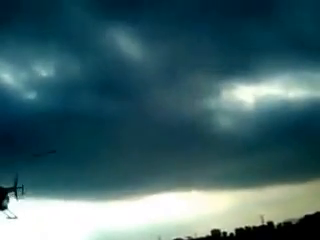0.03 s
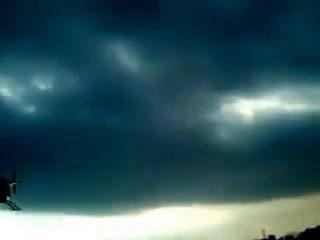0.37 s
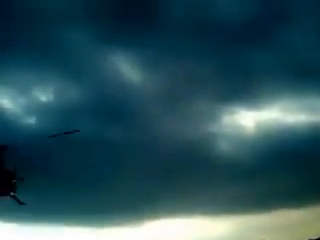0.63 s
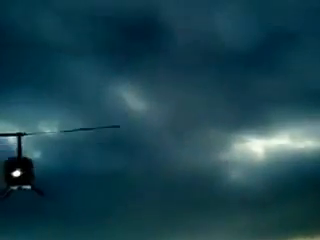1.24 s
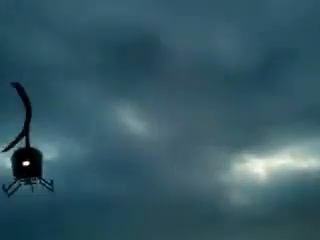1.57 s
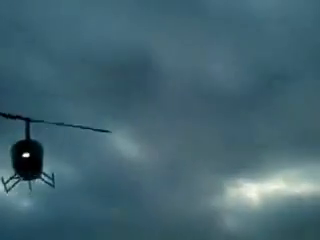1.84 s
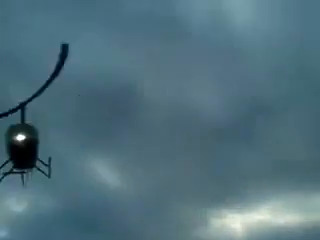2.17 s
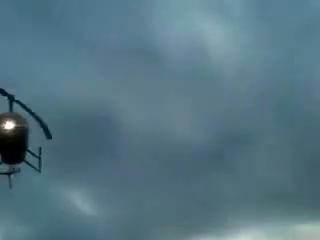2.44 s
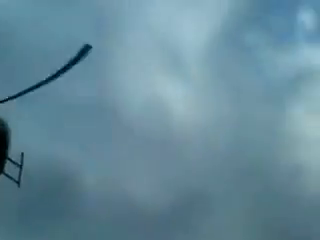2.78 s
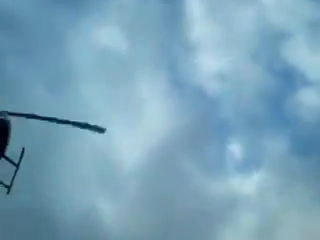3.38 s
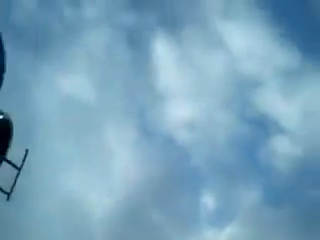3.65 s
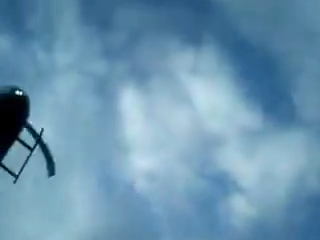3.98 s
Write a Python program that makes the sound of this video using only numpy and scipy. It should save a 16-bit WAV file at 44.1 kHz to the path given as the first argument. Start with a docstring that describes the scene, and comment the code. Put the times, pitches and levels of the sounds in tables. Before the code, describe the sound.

A light helicopter flies toward a microphone in the open with fast, sharp blade slaps. It then sweeps close overhead, where engine roar, tail rotor buzz and a brief raspy hiss take over from the chopping.

```python
"""Low helicopter pass

One microphone in the open, above reflecting ground. A light two-blade piston helicopter flies in low
and passes almost overhead. Farther out the main rotor thumps and slaps; close up, exhaust drone,
tail rotor buzz and rushing air take over. Each sound also arrives off the ground, later as the
machine nears, which sweeps a comb down through it."""
import sys
import numpy as np
from scipy import signal
from scipy.fft import rfft, irfft
from scipy.io import wavfile

SR = 44100
rng = np.random.default_rng(int(sys.argv[2]) if len(sys.argv) > 2 else 0)


def waveform_to_disk(signal):
    """Save audio, clipped to [-1, 1], as 16-bit WAV at the path in sys.argv[1]."""
    frames = np.transpose(np.atleast_2d(signal))
    scaled = np.clip(frames, -1, 1) * 32767
    samples = np.round(scaled).astype(np.int16)
    wavfile.write(sys.argv[1], SR, samples)


N = 176400
TIME = np.arange(N) / SR
CYLINDERS = 6

# Main blade passes as heard at the microphone, the Doppler shift easing off: time_s, rate_hz
BLADE_PASS_RATE = [(0, 13.74), (.7, 13.82), (1.7, 13.82), (2.5, 13.73), (3.2, 13.72), (4, 13.68)]


def main_rotor(passes, thump_lead_s=.0013, swish_lead_s=.00033, swish_width_s=.011):
    """Each blade pushes air aside: a deep throb that fades under the disc, a thump and a swish."""
    throb_level = [(0, -29), (1, -26), (2.75, -27.5), (3.1, -29.5), (4, -30.5)]  # time_s, level_db
    blade_levels = [(0, -24.5, -24), (.33, -25, -23.5), (.55, -28.5, -24), (.84, -32, -24),
                    (.92, -18.5, -25), (1.2, -19.5, -24), (1.38, -36.5, -26.5), (1.57, -17.5, -25),
                    (1.72, -16, -29), (1.93, -22.5, -19.5), (2.08, -16, -22.5), (2.45, -22.5, -20),
                    (2.85, -25.5, -23), (3.2, -40, -35), (4, -32.5, -21.5)]  # time_s, thump_db, swish_db
    # Spectra of the three parts: frequency_hz, gain_db
    throb_spectrum = [(12, -18), (27, -4.5), (70, -0.5), (110, -13.5), (200, -19.5), (1000, -76.5)]
    thump_spectrum = [(30, -25), (80, -2.5), (200, 2), (300, -3.5), (500, -18.5), (3000, -81.5)]
    swish_spectrum = [(40, -28), (150, 0.5), (300, 0), (550, -2.5), (850, -7.5), (1200, -19.5),
                      (1600, -19.5), (2200, -31), (4000, -37.5), (7000, -59.5)]
    pass_s = TIME[1:][np.diff(np.floor(passes)) > 0]
    pushes = np.zeros(N)
    pushes[np.round((pass_s - thump_lead_s) * SR).astype(int) % N] = 1
    from_pass_s = ((passes + .5) % 1 - .5) / curves(BLADE_PASS_RATE)[0]
    sweep = .061 + np.exp(-abs(from_pass_s + swish_lead_s) / swish_width_s)  # faint between blades
    thump_db, swish_db = curves(blade_levels)
    throb = amp(curves(throb_level)[0]) * colour(pushes, throb_spectrum)
    thump = amp(thump_db) * colour(pushes, thump_spectrum)
    swish = amp(swish_db) * colour(sweep * rng.standard_normal(N), swish_spectrum)
    return throb + thump + swish


def blade_slaps(vortices=4, scatter_s=.003, lesser_gain=.21, crack_lag_s=.0029, crack_decay_s=.0018):
    """A blade cuts tip vortices: one main hit, lesser ones around it, and a short bright crack."""
    # Slaps on the approach, in relative levels: time_s, body_db, crack_db
    slaps = [(.045, -21, -29.5), (.118, -21, -35), (.19, -24.5, -34), (.263, -20.5, -35),
             (0.337, -26, -23.5), (.408, -24, -23), (.481, -23.5, -28), (.552, -23, -12.5),
             (0.624, -22, -37), (.698, -23.5, -34), (0.766, -19, -31), (0.843, -23, -36),
             (.915, -22.5, -30.5), (0.988, -23.5, -25), (1.059, -27, -22.5), (1.133, -25, -16.5),
             (1.204, -26, -26), (1.275, -29, -17.5), (1.349, -28, -30), (1.422, -32, -26),
             (1.494, -29, -28.5), (1.566, -29, -38.5), (1.639, -25.5, -31), (1.712, -23.5, -17),
             (1.784, -24, -16.5), (1.856, -22.5, -27), (1.93, -22, -16), (2.002, -24.5, -30.5),
             (2.074, -29, -26.5), (2.147, -24.5, -33), (2.22, -27.5, -19), (2.292, -28.5, -23.5),
             (2.365, -21.5, -27)]
    # Spectra of the two parts: frequency_hz, gain_db
    body_spectrum = [(60, -17), (200, 1), (560, 12), (780, 1.5), (1100, -8), (1600, -12), (2200, -36),
                     (7000, -60.5)]
    crack_spectrum = [(200, -10), (600, 12), (1100, 0), (1600, 4.5), (2300, -14.5), (4000, -22.5),
                      (5500, -27.5), (7300, -44)]
    hits, bursts = np.zeros(N), np.zeros(N)
    lesser = np.arange(vortices) > 0
    for time_s, body_db, crack_db in slaps:
        hit_s = time_s + scatter_s * rng.standard_normal(vortices) * lesser
        at = np.round(hit_s * SR).astype(int)
        hits[at] = -np.where(lesser, lesser_gain, 1) * amp(body_db)
        near = slice(max(at[0] - SR // 20, 0), at[0] + SR // 20)
        bursts[near] += amp(crack_db) * np.exp(-abs(TIME[near] - time_s - crack_lag_s) / crack_decay_s)
    period_samples = SR / BLADE_PASS_RATE[0][1]
    body = amp(-2) * np.sqrt(period_samples) * filtered(hits, body_spectrum)
    return body + bursts * colour(rng.standard_normal(N), crack_spectrum)


def exhaust(cycles, cycle_hz, boom_db, overtones_db, jitter_cycles=.0039, flutter_db=1.4):
    """Six firings a cycle: a clean boom under wavering overtones; unequal cylinders add lines between."""
    # Firing overtones and the lines between them: frequency_hz, gain_db
    firing_spectrum = [(274, -2.5), (411, -14.5), (548, -14), (820, -32), (2000, -53), (4000, -61.5)]
    uneven_spectrum = [(23, -36.5), (115, -23), (210, -13.5), (297, -21.5), (320, -13.5), (480, -24),
                       (750, -24.5), (1100, -35), (2000, -49.5), (4000, -54)]
    k = np.arange(1, 171)
    uneven = gain_at(uneven_spectrum, k * cycle_hz) * np.exp(2j * np.pi * rng.random(len(k)))
    pipe_smear = np.exp(-.4j * (k / CYLINDERS - 1) ** 2)  # the pipe spreads each pulse in time
    firing = (k > CYLINDERS) * gain_at(firing_spectrum, k * cycle_hz) * pipe_smear
    harmonics = np.where(k % CYLINDERS == 0, firing, uneven)
    overtones = periodic_wave(cycles + jitter_cycles * drift(44), harmonics)
    boom = np.sqrt(2) * np.cos(2 * np.pi * CYLINDERS * cycles)
    return amp(boom_db) * boom + amp(overtones_db + flutter_db * drift(10)) * overtones


def tail_rotor(passes, pitch_hz, jitter_cycles=.023, flutter_db=2.5):
    """A buzz of blade pulses, shaken by the wake of the main rotor."""
    buzz_spectrum = [(82, -1), (163, -0.5), (245, -7.5), (410, -12.5), (570, -20), (820, -29),
                     (4000, -57.5)]  # frequency_hz, gain_db
    harmonics = 1j * gain_at(buzz_spectrum, pitch_hz * np.arange(1, 49))
    pulses = periodic_wave(passes + jitter_cycles * drift(33), harmonics)
    return pulses * amp(flutter_db * drift(37))


def tail_rasp(passes, sharpness=1.1):
    """A puff of hiss from each tail blade, loudest as the disc sweeps past edge-on."""
    rasp_level = [(0, -65), (2.3, -50.5), (2.5, -37), (2.6, -28.5), (2.7, -38), (2.88, -39), (3.1, -49),
                  (4, -40.5)]  # time_s, level_db
    rasp_spectrum = [(400, -22), (1000, 9.5), (1700, 10.5), (2300, -5), (3100, 1), (3900, -5), (4800, -14),
                     (7000, -34.5)]  # frequency_hz, gain_db
    puffs = np.exp(sharpness * np.cos(2 * np.pi * passes)) * rng.standard_normal(N)
    return amp(curves(rasp_level)[0]) * colour(puffs, rasp_spectrum)


def rushing_air(spectrum, chop, gust_db):
    """Turbulent noise, pulsed by the machinery and gusting."""
    return colour(rng.standard_normal(N) * chop, spectrum) * amp(gust_db * drift(12))


def whistle(pitch_hz=3600, waver=.011):
    """A thin, breathy whistle from the machinery that flares up twice."""
    whistle_level = [(0, -59.5), (2.26, -58.5), (2.295, -47), (2.35, -65), (2.55, -54), (2.61, -47),
                     (2.67, -54)]  # time_s, level_db
    hz = pitch_hz * (1 + waver * drift(150))
    return amp(curves(whistle_level)[0]) * np.sqrt(2) * np.sin(2 * np.pi * np.cumsum(hz) / SR)


def with_ground_echo(direct, lag_ms):
    """Direct sound plus its echo off the ground, which returns most of the bass and little treble."""
    ground_reflection = [(90, -1), (280, -3.5), (700, -9.5), (2000, -14), (6000, -13.5)]  # frequency_hz, gain_db
    echo = irfft(rfft(direct) * gain_at(ground_reflection, np.fft.rfftfreq(N, 1 / SR)), N)
    return direct + np.interp(TIME - lag_ms / 1000, TIME, echo)


def amp(db):
    """Decibels to gain."""
    return 10 ** (np.asarray(db) / 20)


def unit_rms(x):
    """Scales to rms 1."""
    return x / np.sqrt(np.mean(x ** 2) + 1e-20)


def curves(table):
    """Every column of a time table, sample by sample."""
    time_s, *columns = np.transpose(table)
    return [np.interp(TIME, time_s, column) for column in columns]


def gain_at(spectrum, hz):
    """Gain of a spectrum at the given frequencies."""
    frequency_hz, gain_db = np.transpose(spectrum)
    return amp(np.interp(np.log(hz + 1), np.log(frequency_hz), gain_db))


def filtered(x, spectrum, size=8192):
    """Minimum-phase filter with the given spectrum and unit energy."""
    log_gain = np.log(gain_at(spectrum, abs(np.fft.fftfreq(size, 1 / SR))))
    response = np.exp(np.conj(signal.hilbert(log_gain)))
    taps = np.fft.ifft(response).real[:size // 2]
    return signal.oaconvolve(x, taps / np.linalg.norm(taps))[:N]


def colour(x, spectrum):
    """Gives a sound the spectrum, at rms 1."""
    return unit_rms(filtered(x, spectrum))


def drift(rate_hz):
    """Slow random wander, rms 1."""
    hz = np.fft.rfftfreq(N, 1 / SR)
    slow_band = np.exp(-(hz / rate_hz) ** 2) * (hz > 0)
    return unit_rms(irfft(rfft(rng.standard_normal(N)) * slow_band, N))


def periodic_wave(cycles, harmonics, size=4096):
    """A wave built from its harmonics, following a count of cycles, at rms 1."""
    wave = irfft(np.append(0, harmonics), size)
    return unit_rms(np.interp(cycles % 1, np.arange(size + 1) / size, np.append(wave, wave[0])))


def scene(first_pass_s=.045, tail_ratio=5.938, engine_ratio=1.6655):
    """Both rotors and the engine are geared to one shaft; each is heard with its own ground echo."""
    # Balance as the machine nears: time_s, boom_db, overtones_db, tail_db, rush_db, hiss_db
    approach_levels = [(0, -25.5, -37.5, -24, -19, -43), (.5, -20, -23, -21, -26.5, -41.5),
                       (1, -22, -23.5, -23.5, -30, -43), (1.5, -27, -22, -20.5, -34.5, -42.5),
                       (2, -27.5, -23.5, -23, -29.5, -43.5), (2.35, -22.5, -20.5, -22, -28.5, -39.5),
                       (2.6, -21, -18.5, -22.5, -25, -42), (2.85, -22.5, -17, -24, -21.5, -37.5),
                       (3.05, -22, -17.5, -24.5, -23.5, -36.5), (3.45, -21, -17, -22.5, -22, -36),
                       (3.6, -22.5, -15, -22, -23, -33.5), (3.82, -21.5, -15.5, -22.5, -22, -37),
                       (3.93, -27.5, -19, -21.5, -19.5, -33.5)]
    # Lag of the ground echo at the microphone: time_s, rotor_ms, engine_ms, tail_ms
    echo_lags = [(0, 2.95, 4, 1.7), (.6, 4.16, 3.12, 2.38), (1, 4.7, 3.97, 3), (1.5, 4.94, 4.22, 3.47),
                 (2, 6.48, 4.56, 4.6), (2.27, 7.25, 5.86, 5.1), (2.55, 8.05, 6.31, 6.3),
                 (3.08, 8.9, 6.92, 6.7), (3.25, 8.9, 7.7, 8), (4, 8.9, 8.33, 8.4)]
    # Air noise at the main rotor and at the engine: frequency_hz, gain_db
    rush_spectrum = [(15, -16), (40, -10), (100, -17.5), (280, -3.5), (450, 0), (700, -5), (900, -5.5),
                     (1100, -10), (1600, -17), (4000, -45), (7000, -66)]
    hiss_spectrum = [(300, -39), (1000, 3.5), (1700, 2.5), (3000, -7), (3650, -9.5), (4600, -14),
                     (5600, -18), (7400, -31)]
    boom_db, overtones_db, tail_db, rush_db, hiss_db = curves(approach_levels)
    rotor_ms, engine_ms, tail_ms = curves(echo_lags)
    blade_hz, = curves(BLADE_PASS_RATE)
    passes = np.cumsum(blade_hz) / SR - first_pass_s * blade_hz[0]
    tail_passes, engine_cycles = passes * tail_ratio, passes * engine_ratio
    tail_chop = .19 * np.cos(2 * np.pi * tail_passes)
    exhaust_chop = .2 * np.cos(2 * np.pi * CYLINDERS * engine_cycles)
    chop = np.exp(tail_chop + exhaust_chop)

    rotor = main_rotor(passes) + blade_slaps()
    rotor += amp(rush_db) * rushing_air(rush_spectrum, chop, gust_db=2.3)
    engine = exhaust(engine_cycles, blade_hz.mean() * engine_ratio, boom_db, overtones_db)
    engine += amp(hiss_db) * rushing_air(hiss_spectrum, chop, gust_db=1.56) + whistle()
    tail = amp(tail_db) * tail_rotor(tail_passes, blade_hz.mean() * tail_ratio) + tail_rasp(tail_passes)
    mix = (with_ground_echo(rotor, rotor_ms) + with_ground_echo(engine, engine_ms)
           + with_ground_echo(tail, tail_ms))
    return amp(.8) * mix[None]


def record(dry, low_cut_hz=20, ceiling=.97, knee=8, high_cut_hz=7380):
    """The microphone drops the lowest rumble; loud peaks are rounded off and the top treble is cut."""
    heard = signal.sosfilt(signal.butter(2, low_cut_hz, "high", fs=SR, output="sos"), dry)
    rounded = heard / (1 + abs(heard / ceiling) ** knee) ** (1 / knee)
    high_cut = signal.firwin(511, high_cut_hz, window=("kaiser", 9), fs=SR)
    return signal.oaconvolve(rounded, high_cut[None], "same")


dry = scene()
out = record(dry)
waveform_to_disk(out)
```